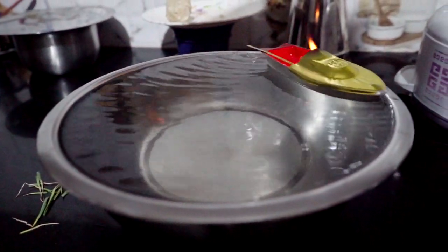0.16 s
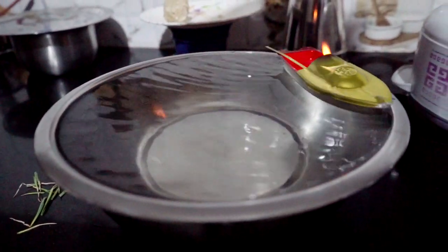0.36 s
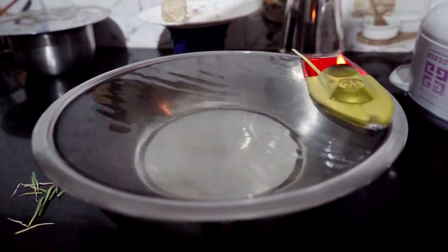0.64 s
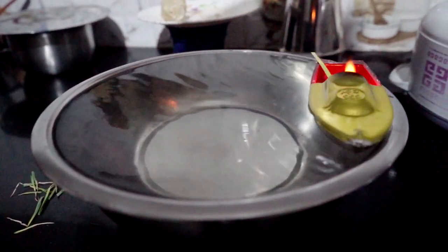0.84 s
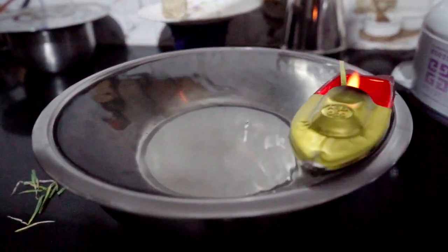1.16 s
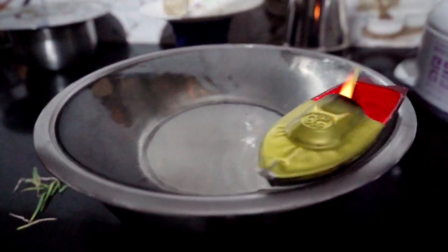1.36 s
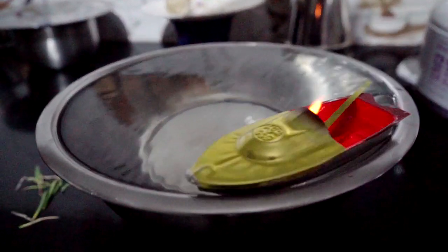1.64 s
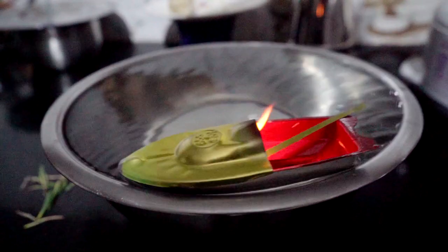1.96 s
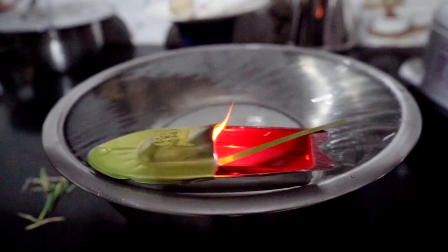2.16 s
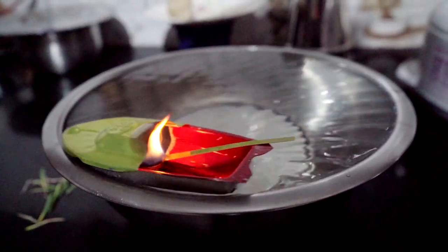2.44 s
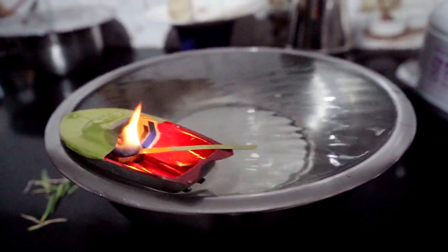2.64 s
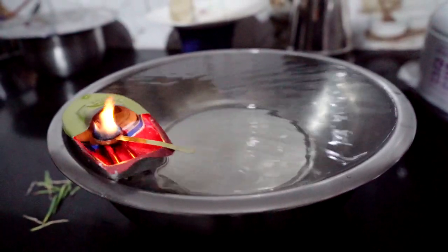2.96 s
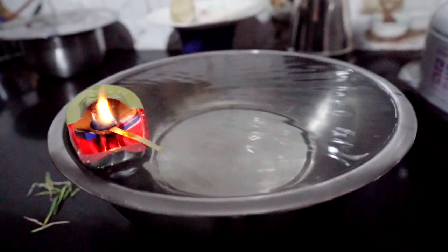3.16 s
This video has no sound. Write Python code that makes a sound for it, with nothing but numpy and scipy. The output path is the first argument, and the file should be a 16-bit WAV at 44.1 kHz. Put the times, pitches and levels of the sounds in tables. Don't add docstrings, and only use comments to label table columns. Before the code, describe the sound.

A small tin boat's boiler lid pops and snaps quickly, briefly stumbling twice, in a hard kitchen.

```python
import sys
import numpy as np
from scipy import signal
from scipy.fft import rfft, irfft, next_fast_len
from scipy.io import wavfile
from scipy.ndimage import uniform_filter1d

SR = 44100
rng = np.random.default_rng(int(sys.argv[2]) if len(sys.argv) > 2 else 0)


def put_to_file(sound):
    columns = np.atleast_2d(sound).T
    safe = np.clip(columns, -1, 1)
    whole_steps = np.round(safe * 32767)
    wavfile.write(sys.argv[1], SR, whole_steps.astype(np.int16))


def undo_db(level):
    steps = np.asarray(level, float) / 20
    return 10 ** steps


N = 145089
LEAD = SR // 10
LEFT_RIGHT = np.array([[0.5], [-0.5]])

# t/s, nearness/dB, left over right/dB, lag of left/samples
COURSE = [
    (0, 3.5, -5, 1.25),
    (.6, 2.5, -6, 1.73),
    (1.2, 1, -6.5, 2),
    (1.7, 1.5, -5.5, 1.64),
    (2.3, 4.5, -2.5, 0.15),
    (2.8, 2, 0.5, 0),
    (3.29, 2.5, 1.5, 0.17),
]
# f/Hz, correlation/1
ROOM_ALIKE = [(300, 1), (700, 0.84), (1400, 0.6), (3000, 0.11), (8000, 0.054)]
# f/Hz, left over right/dB
ROOM_BALANCE = [(300, 6), (1500, -0.5), (4000, 2), (9000, -5), (15000, 3)]

POP_DB, POP_HZ, POP_WIDE_HZ = -7, 1709, 520
SNAP_DB, SNAP_RISE_S, SNAP_T60_S = -1.5, 0.0029, 0.077
HULL_SPREAD = 0.013


def unit(x):
    return x / np.sqrt(np.mean(x ** 2) + 1e-20)


def at(points, s):
    return np.interp(s, *np.transpose(points)[:2])


def along(points, hz):
    f, v = np.transpose(points)
    return np.interp(np.log(hz + 1), np.log(f + 1), v)


def filtered(x, response):
    m = next_fast_len(x.shape[-1] + 8192)
    return irfft(rfft(x, m) * response(np.fft.rfftfreq(m, 1 / SR)), m)[..., :x.shape[-1]]


def peak(f, hz, wide_hz):
    return 1j * f * wide_hz / (hz * hz - f * f + 1j * f * wide_hz)


def grain(db, smooth):
    return undo_db(db * unit(uniform_filter1d(rng.standard_normal(N), size=smooth)))


def pair(noises, alike, balance):
    def mid_side(f):
        turn = np.arccos(np.clip(along(alike, f), -1, 1)) / 2
        return np.array([np.cos(turn), np.sin(turn)])

    mid, side = filtered(noises, mid_side)
    return filtered(np.array([mid + side, mid - side]), lambda f: undo_db(along(balance, f) * LEFT_RIGHT))


def air():
    # f/Hz, level/dB
    tone = [(30, 23), (120, -1), (260, -14), (500, -15.5), (800, -7), (1500, 9.5), (3000, 1.5),
            (16000, -12)]
    noise = pair(grain(2.5, 300) * rng.standard_normal((2, N)), ROOM_ALIKE, ROOM_BALANCE)
    return undo_db(-28) * unit(filtered(noise, lambda f: undo_db(along(tone, f))))


def kitchen(boat):
    # f/Hz, T60/s
    decay = [(500, 1), (1700, 0.61), (5000, 0.87), (10000, 0.22), (14000, 0.7)]
    # f/Hz, level/dB
    tone = [(300, 0.5), (1700, -0.5), (3900, 1.5), (4800, -6), (5800, 0.5), (10000, 4.5), (15000, -1.5)]
    level_db, step_s, predelay = -2.5, 0.3035, 400
    x = boat.mean(0)
    x = np.concatenate([x[LEAD:][:SR // 2], x])
    step = round(step_s * SR)
    padded = np.pad(x, (step, 2 * step))
    fade = np.sin(np.pi * np.arange(2 * step) / (2 * step))
    out = np.zeros((2, len(x) + 2 * SR))
    for start in range(-step, len(x), step):
        hz, t, z = signal.stft(rng.standard_normal((2, SR * 3 // 4)), SR, nperseg=256)
        dying = z * undo_db(-60 * t / along(decay, hz)[:, None])
        tail = signal.istft(dying, SR, nperseg=256)[1]
        tail = filtered(pair(tail, ROOM_ALIKE, ROOM_BALANCE), lambda f: undo_db(along(tone, f)))
        piece = (padded[start + step:][:2 * step] * fade)[None]
        wet = signal.fftconvolve(piece, tail / np.linalg.norm(tail[0]), axes=1)
        first = start + predelay
        out[:, max(first, 0):][:, :wet.shape[1] + min(first, 0)] += wet[:, max(-first, 0):]
    return undo_db(level_db) * out[:, SR // 2:][:, :len(x) - SR // 2]


def bowl(boat):
    # t/s, level/dB
    echoes = [(.0044, -32.5), (.0062, -14), (.0108, -29), (.017, -33)]
    out = boat.copy()
    for k, (s, db) in enumerate(echoes):
        late = np.pad(boat, ((0, 0), (round(s * SR) + k, 0)))
        out += undo_db(db) * late[:, :boat.shape[1]]
    return out


def gurgles():
    # t/s, f/Hz, level/dB, length/s
    bubbles = [
        (0.364, 988, -16.5, 0.066),
        (0.473, 480, -32, 0.085),
        (0.479, 723, -41, 0.041),
        (0.529, 866, -21, 0.079),
        (0.553, 970, -22, 0.075),
        (0.605, 817, -37, 0.058),
        (0.616, 520, -39, 0.069),
        (0.654, 590, -26.5, 0.051),
        (0.694, 847, -22, 0.047),
        (0.675, 1160, -13.5, 0.062),
    ]
    rise, waver_rad = 0.01, 3.5
    out = np.zeros(N)
    for s, hz, db, length in bubbles:
        t = np.arange(round(length * SR)) / SR
        waver = waver_rad / 2 * unit(uniform_filter1d(rng.standard_normal(SR // 8), size=900))[:len(t)]
        phase = 2 * np.pi * hz * t * (1 + rise * t / length / 2) + waver
        out[round(s * SR):][:len(t)] += undo_db(db) * np.sin(np.pi * t / length) * np.sin(phase)
    return out * undo_db(-12 + np.array([[-0.6], [0.6]]))


def sizzle():
    # f/Hz, level/dB
    tone = [(500, -30), (1000, -7), (3000, -16.5), (6000, -15), (9500, -16), (11500, -21), (13000, -27)]
    start_s, rise_s, hold_s, t60_s = 0.429, 0.022, 0.093, 0.98
    level_db, balance_db = -23.5, -4.5
    t = np.arange(N) / SR - start_s
    shape = np.clip(t / rise_s, 0, 1) * undo_db(-60 * np.clip(t - hold_s, 0, None) / t60_s)
    hiss = grain(4, 50) * rng.standard_normal((2, N))
    hiss = unit(filtered(hiss, lambda f: undo_db(along(tone, f))))
    return undo_db(level_db + balance_db * LEFT_RIGHT) * shape * hiss


def add(track, s, sound, treble):
    t, near_db, pan_db, lag = np.transpose(COURSE)
    pan = np.interp(s, t, pan_db) * (1.7 if treble else 1) / 2
    closer_db = 0 if treble else np.interp(s, t, near_db)
    left_late = round(np.interp(s, t, lag))
    for side, gain_db, late in ((0, pan, left_late), (1, -pan, 0)):
        part = track[side, round(s * SR) + LEAD + late:][:sound.shape[-1]]
        part += undo_db(gain_db + closer_db) * sound[side][:len(part)]


def knock(db, detune):
    t = np.arange(SR // 50) / SR
    u = np.pi * POP_WIDE_HZ * t
    wave = u * np.exp(1 - u) * np.sin(2 * np.pi * POP_HZ * (1 + 0.017 * detune) * t)
    return undo_db(db) * np.array([wave, wave])


def thud(db):
    wide_hz, t60_s, scatter = 637, 0.031, 0.036
    t = np.arange(SR // 20) / SR
    hz = POP_HZ * (1 + scatter * rng.standard_normal())
    burst = rng.standard_normal(len(t)) * (1 - np.exp(-t / SNAP_RISE_S)) * undo_db(-60 * t / t60_s)
    wave = filtered(burst, lambda f: peak(f, hz, wide_hz) ** 2)
    return undo_db(db) * np.array([wave, wave]) / np.std(wave[:SR // 90])


def ring(modes, db, phase_spread):
    rise_s, scatter_db = 0.00042, 3
    t = np.arange(SR // 20) / SR
    chances = rng.standard_normal((len(modes), 4))
    sound = np.zeros((2, len(t)))
    for (hz, level_db, t60), (louder, detune, turn, apart) in zip(modes, chances):
        phase = 3 * turn + phase_spread * apart * LEFT_RIGHT
        wave = np.sin(2 * np.pi * hz * (1 + HULL_SPREAD * detune) * t + phase)
        sound += undo_db(level_db + scatter_db * louder - 60 * t / t60) * wave
    return undo_db(db) * sound * (1 - np.exp(-t / rise_s))


def turned(s):
    # f/Hz, level/dB, T60/s
    tin = [(4070, -13, 0.016), (5310, -5, 0.017), (5783, 3, 0.02), (8250, -4, 0.0083)]
    # t/s, lower over upper ring/dB
    turning = [(0, 1), (1.65, 0.5), (1.8, 20), (1.92, 7), (2.1, -1.5), (2.6, 4), (3.05, 8), (3.14, 16),
               (3.29, 0)]
    lean_db = at(turning, s) / 2
    return [(hz, db + lean_db * lean, t60) for (hz, db, t60), lean in zip(tin, (0, 1, -1, 0))]


def rattle(s, db, rise_s, t60, low_hz=300):
    # f/Hz, width/Hz, level/dB
    hull_modes = [(1600, 1180, -0.5), (2460, 3060, -4), (3873, 910, 0), (5560, 1380, -1), (6490, 610, -1.5),
                  (8360, 1770, -1.5), (8820, 280, -3.5), (10070, 3700, -1), (13780, 4700, -6)]
    # t/s, level/dB
    facing = [(0, -6.5), (1, -8.5), (1.8, -4), (2.5, -5.5), (2.9, -14), (3.29, -14)]
    hold_s, alike, facing_hz, edge_hz = 0.0094, 0.45, 9660, 5500
    crack_db, crack_s, crack_rise_s = 2, 0.0012, 0.0003
    fill_db, scatter_db = -13.5, 3
    t = np.arange(SR // 12) / SR
    noise = rng.standard_normal((3, len(t)))
    shape = (1 - np.exp(-t / rise_s)) * undo_db(-60 * t / t60) / (1 + (t / hold_s) ** 4)
    shape += undo_db(crack_db) * (1 - np.exp(-t / crack_rise_s)) * np.exp(-t / crack_s)
    burst = (np.sqrt(alike) * noise[0] + np.sqrt(1 - alike) * noise[1:]) * shape
    vary, shift = rng.standard_normal((2, len(hull_modes)))
    top = undo_db(at(facing, s)) - 1

    def hull(f):
        body = undo_db(fill_db)
        for (hz, wide_hz, level_db), v, p in zip(hull_modes, vary, shift):
            body = body + undo_db(level_db + scatter_db * v) * peak(f, hz * (1 + HULL_SPREAD * p), wide_hz) ** 2
        low_cut = (1j * f / (low_hz + 1j * f)) ** 2
        return body * low_cut * (1 + top / (1 + (facing_hz / (f + 1)) ** 6))

    sound = filtered(burst, hull)
    treble = filtered(sound.mean(0), lambda f: f > edge_hz)[:SR // 110]
    return undo_db(db) * sound / np.std(treble)


def pop(out, s):
    # t/s after the pop, level/dB
    rebounds = [
        (.0042, -12),
        (.0108, -17),
    ]
    # f/Hz, level/dB, T60/s
    after = [(793, -31.5, 0.04), (1469, -19, 0.039), (1680, -14.5, 0.032), (1860, -16.5, 0.037),
             (2047, -21, 0.061), (2400, -18, 0.029), (2960, -28.5, 0.011), (3950, -20, 0.012)]
    # t/s, level/dB
    after_course = [(0, -3.5), (.35, 2), (.6, 0), (1, 1), (1.5, 4.5), (1.9, 1.5), (2.45, -1), (2.9, 4),
                    (3.29, 2.5)]
    creak_s, creak_db, creak_spread_s = 0.0045, -16, 0.001
    tick_db, tick_t60_s, tick_hz = -25.5, 0.057, 7400
    c = rng.standard_normal(5)
    creak = knock(POP_DB + creak_db + 3 * c[1], 2 * c[2])
    add(out, s - creak_s + creak_spread_s * c[0], creak, False)
    add(out, s, knock(POP_DB - 0.5 * c[3], c[4]), False)
    add(out, s, rattle(s, POP_DB + tick_db, SNAP_RISE_S / 2, tick_t60_s, tick_hz), True)
    add(out, s + 0.000985, ring(after, POP_DB + at(after_course, s), 0.45), False)
    for later, loss_db in rebounds:
        a, b = rng.standard_normal(2)
        add(out, s + later + 0.00046 * a, knock(POP_DB + loss_db + 2 * b, a - 1), False)


def snap_back(out, s, back, ring_db, rattle_db, thud_db):
    c = rng.standard_normal(2)
    own_db = thud_db - at(COURSE, s)
    add(out, back - 0.002429, thud(own_db - 3.5), False)
    add(out, back - 0.0005, knock(own_db + 4.5 + c[1], 2 * c[0]), False)
    add(out, back - 0.0003, rattle(s, rattle_db + SNAP_DB, SNAP_RISE_S, SNAP_T60_S, 2280), True)
    add(out, back - 0.0003, ring(turned(back), ring_db + 6.5, 0.31), True)


def engine():
    # pop t/s, snap-back delay/ms, ring level/dB, rattle level/dB, thud level/dB
    strokes = [(-0.0177, 31.4, -24, -26, -19), (0.0418, 31.6, -22, -26, -23),
               (0.101, 32.2, -24, -27, -23), (0.1636, 31.6, -28, -26, -24),
               (0.2275, 31.3, -23, -26, -20), (0.2933, 28.1, -21, -26, -19),
               (0.4082, 29.2, -24, -25, -26), (0.4688, 31.5, -28, -24, -21),
               (0.5284, 31.4, -28, -25, -20), (0.5874, 31.2, -28, -25, -21),
               (0.6451, 31.3, -22, -25, -27), (0.7041, 33.5, -18, -29, -22),
               (0.7667, 32.4, -19, -26, -21), (0.8286, 31.9, -23, -26, -18),
               (0.89, 32.1, -22, -22, -22), (0.9525, 32.5, -20, -24, -24),
               (1.0148, 31.8, -21, -29, -24), (1.0769, 32.3, -18, -25, -28),
               (1.1383, 32.3, -19, -27, -27), (1.1988, 33.2, -30, -24, -20),
               (1.2607, 33.9, -21, -29, -25), (1.3238, 31.6, -19, -26, -28),
               (1.384, 31.2, -30, -25, -21), (1.4434, 32.3, -26, -27, -21),
               (1.5057, 31.7, -21, -24, -26), (1.5653, 32.3, -26, -28, -18),
               (1.6261, 33.1, -22, -26, -19), (1.6879, 32.7, -27, -26, -21),
                    (1.7494, 31.6, -27, -24, -18), (1.81, 32.3, -26, -24, -20),
                    (1.8705, 32.1, -29, -27, -16), (1.9301, 33.2, -24, -25, -18),
                    (1.9919, 32.7, -25, -28, -21), (2.0524, 33, -25, -24, -19),
                    (2.1147, 33.1, -27, -28, -18), (2.1762, 32.7, -26, -24, -18),
                    (2.2372, 33.5, -22, -31, -17), (2.2989, 32.9, -22, -25, -17),
                    (2.3604, 33, -21, -23, -18), (2.4225, 32.4, -19, -22, -20),
                    (2.4857, 31.9, -19, -23, -17), (2.5496, 31.1, -21, -22, -23),
                    (2.6108, 32.1, -24, -26, -13), (2.6735, 31.6, -21, -23, -27),
                    (2.7356, 32.4, -21, -28, -16), (2.799, 32.9, -19, -24, -26),
                    (2.8678, 29.7, -27, -25, -17), (2.9347, 26.9, -21, -25, -22),
                    (3.0494, 29.3, -22, -25, -20), (3.1123, 30.2, -19, -26, -17),
                    (3.1753, 30.8, -20, -26, -20), (3.2365, 31.5, -20, -25, -27)]
    # t/s, level/dB
    misfires = [
        (.348, -27),
        (.371, -31),
        (.462, -20),
        (2.988, -27),
        (3.021, -27),
        (3.043, -25),
    ]
    out = np.zeros((2, N + LEAD))
    for s, back_ms, ring_db, rattle_db, thud_db in strokes:
        pop(out, s)
        snap_back(out, s, s + back_ms / 1000, ring_db, rattle_db, thud_db)
    for s, db in misfires:
        add(out, s, rattle(s, db - 8.5 + SNAP_DB, SNAP_RISE_S, SNAP_T60_S), True)
    return out


def scene():
    boat = engine()
    return (bowl(boat) + kitchen(boat))[:, LEAD:] + sizzle() + gurgles() + air()


def roll_off(x):
    return signal.sosfilt(signal.butter(12, 16970, fs=SR, output="sos"), x)


def record(dry):
    ceiling, mono_hz, mic_hz, top_hz = 0.72, 560, 478, 15600
    soft = dry / (1 + np.abs(dry / ceiling) ** 4) ** (1 / 4)

    def narrow(f):
        return 1 - 0.94 / (1 + (f / mono_hz) ** 6) / (1 + (130 / (f + 1)) ** 4)

    def microphone(f):
        return (1j * f / (mic_hz + 1j * f)) ** 3 / (1 + (f / top_hz) ** 90)

    side = filtered((soft[0] - soft[1]) / 2, narrow)
    stereo = soft.mean(0) + np.array([side, -side])
    return roll_off(filtered(stereo, microphone))


dry = scene()
out = record(dry)
put_to_file(out)
```